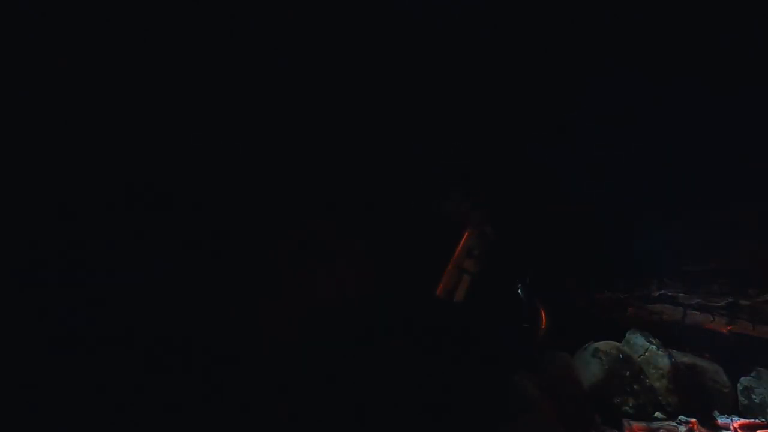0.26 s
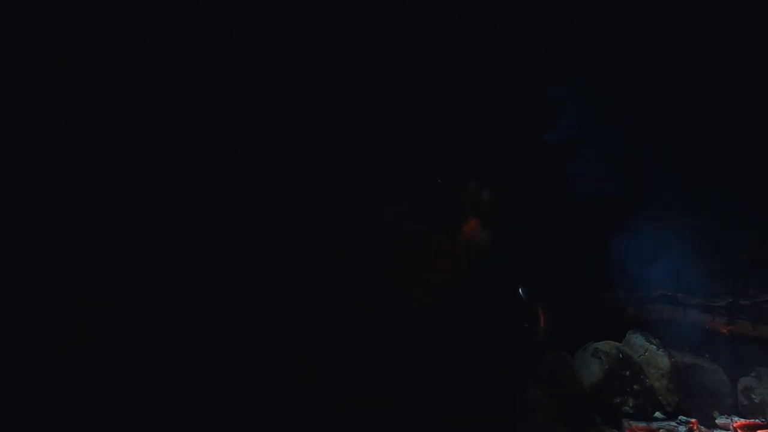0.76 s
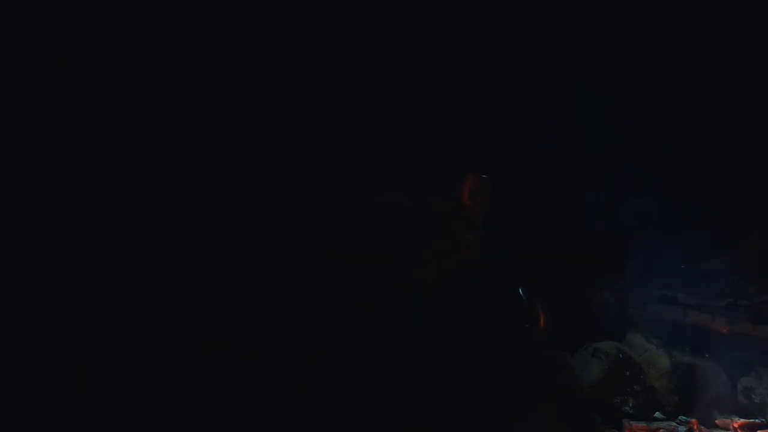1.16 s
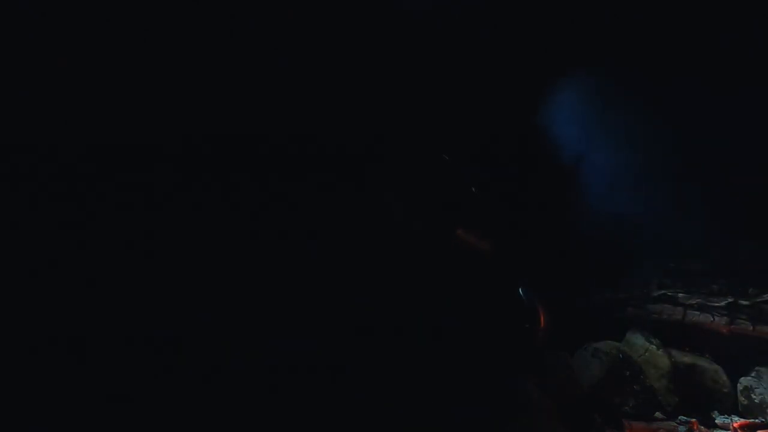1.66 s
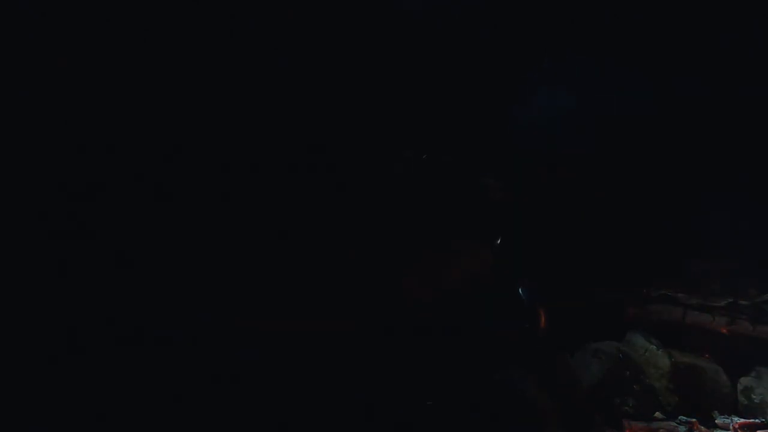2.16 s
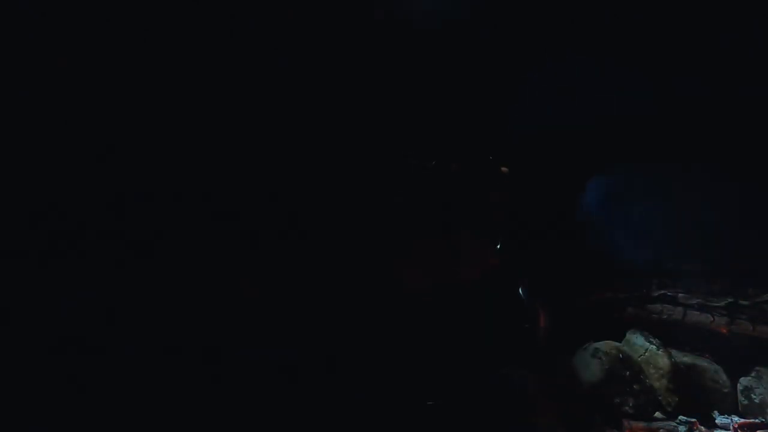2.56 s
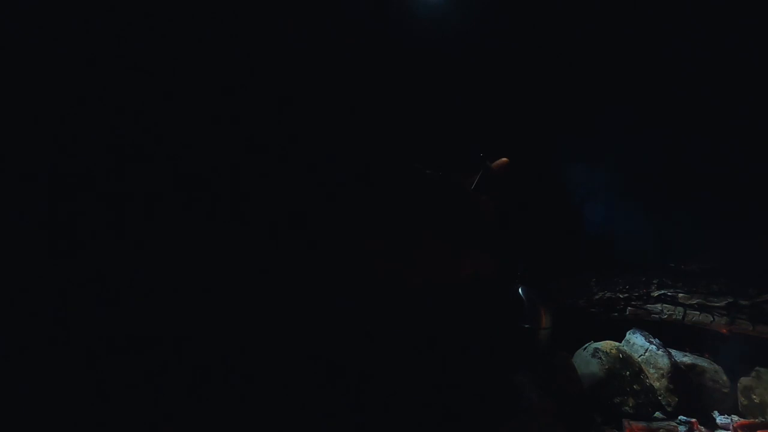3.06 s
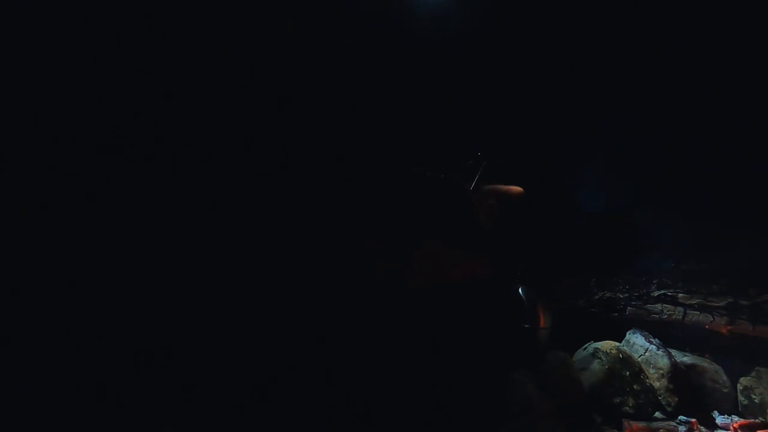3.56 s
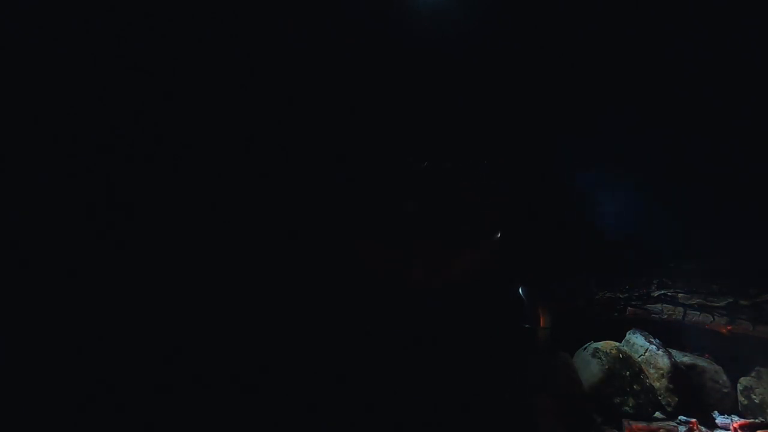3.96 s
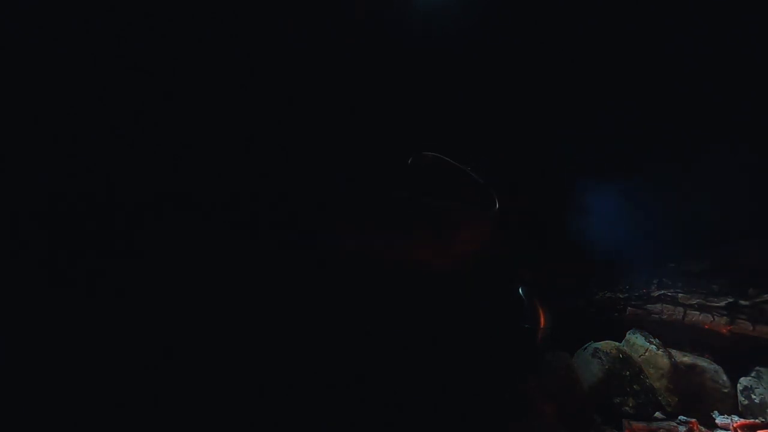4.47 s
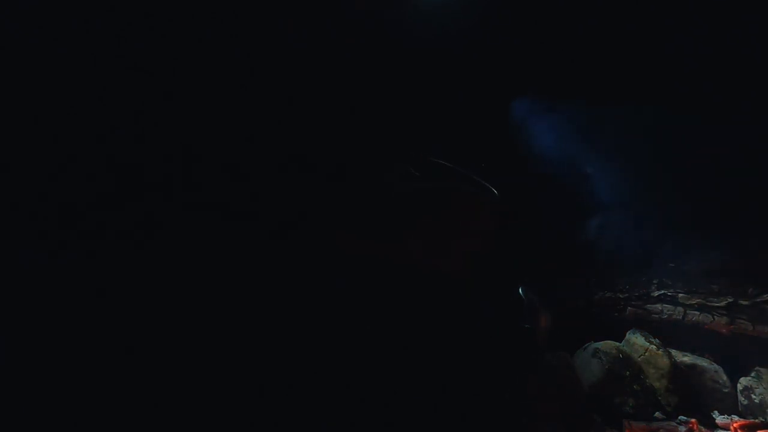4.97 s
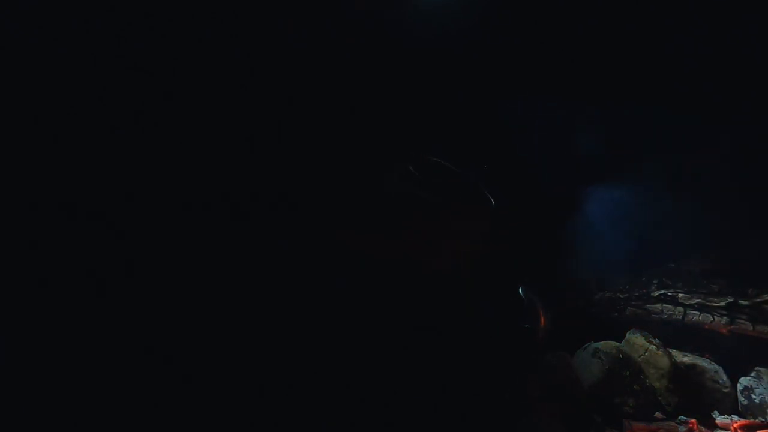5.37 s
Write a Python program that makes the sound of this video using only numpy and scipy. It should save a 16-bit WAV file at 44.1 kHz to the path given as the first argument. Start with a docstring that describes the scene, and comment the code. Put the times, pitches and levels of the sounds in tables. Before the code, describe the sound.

Close stereo pickup of hands working a spoon and tin by a small campfire. Dry, quickly damped metallic knocks and chatters, some with thin clear spoon ringing, come irregularly. A cloth rustle starts near the beginning and stops before two seconds. Short scrapes link some blows; a low-toned double clank ends the busy clatter. Soft flame flutter, low puffs, tiny wood ticks and faint hiss continue throughout.

```python
"""From the start a campfire flutters, puffs and ticks over a faint hiss (shaped noise, pulses, clicks).
Cloth rustles in bursts of noise until 1.9 s, and the spoon already rings faintly (decaying sines).
From 0.09 s it knocks and chatters on a hand-held mess tin, a little to the right (noise through modes);
a like knock at 0.25 s starts a rustle. From 0.27 s the spoon also scrapes, and rattles after the blow
at 2.35 s (gritty noise through the modes). From 1.15 s single partials outlast some knocks (sines)."""
import sys
import numpy as np
from scipy import signal
from scipy.fft import rfft, irfft, next_fast_len
from scipy.io import wavfile
from scipy.ndimage import uniform_filter1d, map_coordinates

SR = 44100
rng = np.random.default_rng(int(sys.argv[2]) if len(sys.argv) > 2 else 0)


def unload_audio(sound):
    """Save the sound as a 16-bit wav file, at the path given as the first command line argument."""
    columns = np.transpose(np.atleast_2d(sound))
    # keep every value between -1 and 1, then stretch to whole-number steps
    steps = np.round(np.clip(columns, -1, 1) * 32767)
    wavfile.write(sys.argv[1], SR, steps.astype(np.int16))


N = 247842


def amp(db):
    """Amplitude of a level in dB."""
    return 10 ** (np.asarray(db) / 20)


def unit(x):
    """x scaled to rms 1."""
    return x / np.sqrt(np.mean(x ** 2) + 1e-20)


def along(points, hz):
    """Interpolate (f/Hz, value) points on a log frequency axis."""
    f, v = np.transpose(points)
    return np.interp(np.log(hz + 1), np.log(f + 1), v)


def curves(rows, **ends):
    """One value per sample for each column after t/s."""
    s, *cols = np.transpose(rows)
    return [np.interp(np.arange(N) / SR, s, c, **ends) for c in cols]


def wobble(rate_hz):
    """Smooth random curve with rate_hz knots a second."""
    knots = rng.standard_normal(int(N * rate_hz / SR) + 4)
    return map_coordinates(knots, [np.arange(N) * rate_hz / SR])


def filtered(x, response):
    """x times a complex response of frequency."""
    m = next_fast_len(x.shape[-1] + SR // 2)
    spectrum = rfft(x, m) * response(np.fft.rfftfreq(m, 1 / SR))
    return irfft(spectrum, m)[..., :x.shape[-1]]


def rush(spectrum, alike):
    """Stereo noise of rms 1; mid and side are mixed to the left-right likeness of the table."""
    def shape(hz):
        turn = np.arccos(np.clip(along(alike, hz), -1, 1)) / 2
        return amp(along(spectrum, hz)) * [np.cos(turn), np.sin(turn)]

    mid, side = filtered(rng.standard_normal((2, N)), shape)
    return unit(np.array([mid + side, mid - side]))


def near(hz, centre_hz, width):
    """Broad resonance of height 1; width as a share of its centre."""
    w = 1j * hz * centre_hz * abs(width)
    return w / (centre_hz ** 2 - hz * hz + w)


def bands(hz):
    """Shares of the clank, the knock under it and the sheen over it; a small tin radiates no bass."""
    low = 1 / (1 + (hz / 1500) ** 8)
    high = 1 / (1 + (6000 / (hz + 1)) ** 10)
    knock = low / (1 + (390 / (hz + 1)) ** 4)
    return np.array([1 - low - high, knock, high])


def ringing(modes, hz, share):
    """One damped resonance per row, t60 times share; small plates radiate little below their modes."""
    c, db, t60 = np.transpose(modes)[:, :, None]
    width_hz = np.log(1000) / (np.pi * t60 * share)
    resonance = c / (c * c - hz * hz + 1j * hz * width_hz)
    return amp(db) * (hz / c) ** 2 * resonance / (1 + (hz / c / 2) ** 2)


# hiss spectrum: f/Hz, relative density/dB
HISS_SPECTRUM = [(300, -2), (500, -6.5), (850, -6.5), (1150, -2.5), (2000, -10.5), (5000, -13), (9000, -24),
                 (15500, -39)]


def hiss():
    """Faint steady noise with a slightly unsteady level."""
    level_db = -72.5 + 1.2 * wobble(40)
    return amp(level_db) * rush(HISS_SPECTRUM, [(500, 0.49), (3000, 0.29), (8000, 0.11)])


# flutter of the flames: t/s, level/dB
FLAME_LEVEL = [(0.0, -66.5), (1.36, -69.5), (2.35, -62), (2.58, -71.5), (3.11, -70), (5.62, -70)]
# flutter spectrum: f/Hz, relative density/dB
FLUTTER_SPECTRUM = [(15, -12.5), (30, -6.5), (100, -13.5), (155, 1), (250, -4), (450, -12), (700, -44)]


def flutter():
    """Lumpy low noise of the flames."""
    level_db, = curves(FLAME_LEVEL)
    lumps = amp(2.0 * wobble(25) + 2.2 * wobble(17.0))
    return amp(level_db) * unit(lumps * rush(FLUTTER_SPECTRUM, [(60, 0.32), (300, 0.39)]))


# strongest low thumps, from the flames or the hands: t/s (lobe peaks 8 ms later), lobe level/dB, f/Hz
STRONG_PUFFS = [(0.18, -51, 105), (0.243, -37.5, 201), (0.273, -41, 125), (.288, -43.5, 38.4),
                (.905, -53.5, 83.6), (.943, -45.5, 124), (1.182, -47, 153), (1.873, -40, 182.7),
                (1.901, -50, 170.4), (2.254, -51.5, 86.9), (2.8, -52.5, 101), (3.249, -48, 145),
                (3.82, -54, 90.4)]


def puffs():
    """Low thumps, each a short lobe of pressure riding on a slower push of air."""
    small_db, small_hz, pitch_log_span = -60, 125, 0.98
    push_db, push_slower = -13.5, 3.5
    t = np.arange(N) / SR
    small = [(N / SR * when, small_db + 2.7 * (size - .5), small_hz * np.exp(pitch_log_span * (2 * pitch - 1)))
             for when, size, pitch in rng.random((20, 3))]

    def lobe(u):
        return np.cos(2 * np.pi * u) * np.exp(-(1.5 * u) ** 2)

    out = np.zeros(N)
    for s, db, pitch_hz in list(STRONG_PUFFS) + small:
        u = (t - s - .008) * pitch_hz
        out -= amp(db) * (lobe(u) + amp(push_db) * lobe(u / push_slower))
    return out


def ticks():
    """Faint ticks of the wood: 50 filtered clicks at random times, a little stronger on the left."""
    when, size = rng.random((50, 2)).T
    clicks = np.bincount((when * N).astype(int), amp(-70.0 - 8.2 * size), N)
    colour = [(2500, -27.5), (7000, -4.5), (13000, -23.0)]  # f/Hz, gain/dB
    return filtered(clicks, lambda hz: amp(along(colour, hz))) * amp([[1], [-1.5]])


def fire():
    """Flutter, thumps and wood ticks of a campfire."""
    return flutter() + puffs() + ticks()


# cloth movement: t/s, mean level/dB
RUSTLE_LEVEL = [(0, -62), (.15, -62.5), (.2, -72), (.26, -48), (.5, -55), (.9, -64.5), (1.05, -82.5),
                (1.2, -58), (1.42, -59), (1.53, -53.5), (1.6, -59), (1.77, -57), (1.9, -67)]
# cloth spectrum: f/Hz, relative density/dB
CLOTH_SPECTRUM = [(220, -29), (350, -12), (511, 0), (749, -36.5), (1000, -6.5), (1660, -1), (2320, -2.5),
                  (2750, 0), (4840, -1.5), (12500, -20), (15500, -28)]
# cloth left-right likeness: f/Hz, correlation
CLOTH_LIKENESS = [(60, 0.53), (240, 0.5), (950, 1), (3770, 0.71), (15000, -1.1)]


def cloth():
    """A sleeve brushing as the arm moves: noise of uneven level."""
    level_db, = curves(RUSTLE_LEVEL, right=-140)
    uneven_db = 1.5 * wobble(29) + 0.54 * wobble(210)
    return amp(level_db + uneven_db) * rush(CLOTH_SPECTRUM, CLOTH_LIKENESS)


# spoon modes: f/Hz, relative level/dB, t60/s, part (0 handle, 1 bowl, 2 neck)
SPOON_MODES = [(1290, 0, .68, 0), (1795, -9, .2, 2), (2412, -11, .25, 1), (3095, -5, .25, 1),
               (3233, 0, .34, 1), (4056, 0, .2, 2), (5130, -8, .14, 2), (6436, -20, .22, 1)]
# spoon bounces free and rings: t/s, handle level/dB, bowl level/dB, neck level/dB (before scatter)
SPOON_RINGS = [(0, -61, -64, -86), (0.669, -57.5, -64, -75), (1.149, -64, -45.5, -60),
               (2.381, -43.5, -33.5, -48), (2.912, -63.5, -47, -55.5), (3.127, -62.5, -53.5, -53),
               (3.427, -65.5, -50, -45), (4.15, -58.5, -47, -54), (4.618, -67.5, -67.5, -67),
               (4.89, -63.5, -56, -51), (5.096, -65, -53.5, -53), (5.351, -46, -46, -38.5)]


def spoon():
    """Long clean modes that swell out of the blow and fade."""
    hz, db, t60, part = np.transpose(SPOON_MODES)
    t, out = np.arange(SR)[:, None] / SR, np.zeros(N + SR)
    swell = 1 - np.exp(-t / 0.0031)
    modes = amp(db - 60 * t / t60) * np.sin(2 * np.pi * hz * t) * swell
    for s, *parts_db in SPOON_RINGS:
        scatter_db = rng.normal(0, 1.4, len(hz))
        out[round(s * SR):][:SR] += modes @ amp(np.take(parts_db, part.astype(int)) + scatter_db)
    return out[:N]


# short knocks and chatters, mostly spoon on tin; the one at 0.25 s starts the cloth rustle:
# t/s, clank peak level/dB, knock level relative to clank/dB, brightest f/Hz
KNOCK_EVENTS = [(0.085, -38.5, -19, 3400), (.138, -53.5, 0, 4000), (0.2457, -41, -3.5, 1770),
                (0.3314, -29, -13, 4200), (0.343, -46, 3, 2500), (0.594, -57.5, 10.5, 3620),
                (.627, -35.5, -10.5, 2700), (0.649, -25, -5.5, 3500), (0.66, -19, -21.5, 3600),
                (0.6701, -23, -9, 3720), (0.7544, -43.5, -14, 3030), (.79, -47, -14.5, 3300),
                (.842, -25, -16, 3700), (1.08, -60.5, 2.5, 3100), (1.151, -24, -8.5, 3330),
                (1.285, -25, -23, 3470), (1.2943, -24.5, -24, 3200), (1.349, -49.5, 4.5, 2980),
                (1.363, -26, -13.5, 3430), (1.5066, -41.5, -12.5, 2750), (1.8784, -14.5, -13.5, 4470),
                (1.972, -35, -15, 3600), (1.9875, -20.5, -16.5, 3495), (2.0061, -24, -22, 3640),
                (2.037, -27, -21.5, 5000), (2.062, -27, -8, 8300), (2.1, -36, -7, 8450),
                (2.1629, -30, -21.5, 5200), (2.246, -40, -6, 3000), (2.3, -17.5, -13, 2770),
                (2.346, -14.5, 5.5, 2800), (2.578, -39, -12, 2530), (2.636, -88, 32, 2493),
                (2.9091, -25, -23.5, 5100), (2.9488, -39, -13, 1850), (3.028, -43.5, -13, 3400),
                (3.1109, -28, -15.5, 3050), (3.123, -24.5, -10, 2440), (3.1375, -30.5, -7.5, 4950),
                (3.2819, -51, 0.5, 1920), (3.426, -25, -16, 4730), (3.8672, -42, -3, 3020),
                (3.895, -36, -1.5, 2370), (3.914, -40, -2.5, 3500), (3.9506, -43, -7.5, 3230),
                (4.037, -33, -7.5, 2830), (4.1083, -38, -11, 2600), (4.128, -26, -20, 3500),
                (4.1379, -14, -15.5, 3060), (4.154, -31, -17, 3220), (4.2137, -50.5, 2.5, 3120),
                (4.356, -37.5, -6.5, 2320), (4.449, -31.5, -5, 2730), (4.518, -23.5, -8.5, 3630),
                (4.5356, -21.5, -40, 1900), (4.561, -23, -4, 3140), (4.569, -25.5, -5.5, 5270),
                (4.6178, -34, -8, 5500), (4.675, -64, 19.5, 1540), (4.887, -30.5, -2, 3520),
                (5.09, -33.5, -13, 5830), (5.1318, -48.5, -43, 4150), (5.1813, -35.5, 1, 3380),
                (5.21, -46.5, 2, 1800), (5.246, -41.5, -0.5, 2610), (5.305, -20.5, 1, 3140),
                (5.3208, -15.5, -1.5, 1800), (5.3354, -22.5, -0.5, 1760), (5.3466, -39, 0, 1810),
                (5.4487, -53.5, 11.5, 2780)]
# tin modes: nominal f/Hz, relative level/dB, t60 before the grip's share/s
TIN_MODES = [(660, 2.5, 0.068), (985, -7, .15), (1008.7, -6.5, 0.17), (1258, 7, 0.037), (1433, -2, 0.022),
             (1828, 7, 0.11), (2170, -6.5, 0.12), (2514, -1, 0.088), (2773, 6, 0.063), (2870, 5.5, .09),
             (3000, 3, 0.18), (3370, 0.5, 0.074), (3680, 0, 0.14), (3900, -4, .1), (4305, -8, 0.081),
             (4750, -4, .1), (5340, 0, 0.08), (7490, -3.5, .06), (8700, -6, 0.072)]
# radiation between the modes: f/Hz, relative density/dB
CRACK_SPECTRUM = [(180, -56.5), (300, -15), (1750, -2.5), (2070, -1), (3450, 4), (4350, -0.5), (5130, 3),
                  (6050, -5), (7620, -5), (15500, -32.5)]
# hold of the hand: t/s, share of t60 left, low mode left most free f/Hz
HAND_GRIP = [(0, 1, 1100), (1, 0.3, 905), (1.2, 0.48, 1130), (1.35, 0.61, 550), (1.901, 0.36, 730),
             (2.06, 0.79, 1076), (2.35, 1, 1050), (2.6, 1, 735), (3.3, 0.62, 651), (3.799, 0.6, 1040),
             (4.6, 0.89, 1043), (4.68, 0.17, 1423), (4.9, 0.6, 1085), (5.31, 1, 1020), (5.334, 1, 1010),
             (5.36, 1, 647), (5.6, 0.55, 1230)]
# treble over the clank: t/s, relative level/dB
SHEEN_LEVEL = [(.1, -15), (.25, -0.5), (.33, -15.5), (.65, -16.5), (.85, -13), (1.36, -13.5), (2.06, -4.5),
               (2.3, -2.5), (2.35, -12), (2.6, -21), (3.03, -14.5), (3.12, -10), (3.43, -17), (4.13, -9.5),
               (4.45, -11.5), (4.9, -12), (5.12, -2), (5.22, -23.5), (5.31, -6.5), (5.35, -19)]


def knocks():
    """Each is a blow and a dying chatter through the tin's modes, which answer with random strengths."""
    size, lead = 2 ** 14, 512  # samples
    chatter_t60_s, grip_power, chatter_log_spread = 0.054, 0.32, .15  # a tight grip shortens the bounces
    settle_db, settle_t60_s = -29.5, 0.14  # faint rattle to rest
    flex_log_spread = .008  # the fingers bend the tin, shifting its modes from knock to knock
    hz, t = np.fft.rfftfreq(size, 1 / SR), np.arange(size) / SR
    out = np.zeros(N + size)
    grip_s, *grip_columns = np.transpose(HAND_GRIP)
    # the knock is mostly modes, the clank also noise
    crack = 0.028 * amp(along(CRACK_SPECTRUM, hz)) * (1 - 0.34 * bands(hz)[1])
    for s, db, knock_db, bright_hz in KNOCK_EVENTS:
        spot = amp(3.5 * rng.standard_normal(len(TIN_MODES)))
        bend = flex_log_spread * rng.standard_normal((len(TIN_MODES), 1))
        bent = np.array(TIN_MODES) * np.exp(bend * [1, 0, 0])
        share, free_hz = (np.interp(s, grip_s, col) for col in grip_columns)
        sheen_db = np.interp(s, *np.transpose(SHEEN_LEVEL))

        chatter_s = chatter_t60_s * abs(share) ** grip_power * np.exp(rng.normal(0, chatter_log_spread))
        grit, bounces = rng.standard_normal((2, size))
        force = grit * amp(3.96 * uniform_filter1d(bounces, size=30) * np.sqrt(30))
        decay = amp(-60 * t / max(chatter_s, .005)) + amp(settle_db - 60 * t / settle_t60_s)
        force *= (1 - np.exp(-t / 0.0019)) ** 2 * decay
        # the first blow stands out more in a hard knock
        force[80:89] += 0.9 * amp(0.86 * (db + 0.28 * knock_db + 22.0)) * np.hanning(9)

        favour = 1 + 1.4 * near(hz, bright_hz, 0.15) + 4.1 * near(hz, free_hz, 0.09)
        tin = spot @ ringing(bent, hz, np.clip(share, .2, 1.5))
        body = rfft(np.roll(force, lead)) * favour * (tin + crack)
        parts = irfft(body * bands(hz))
        levels = amp(db + np.array([0, knock_db, sheen_db]))
        out[round(s * SR):][:size] += levels / np.abs(parts).max(axis=1) @ parts
    return out[lead:][:N]


def stroke(u, rising):
    """Strength of one gritty noise over its course u = 0..1: it swells to a peak and eases off to nothing."""
    slope_db, roundness = 9, 0.41
    rising = np.clip(rising, .03, .97)
    away = np.where(u < rising, 1 - u / rising, (u - rising) / (1 - rising)).clip(0, 1)
    return amp(-slope_db * away ** roundness) * (1 - away ** 1.8)


# gritty noise of spoon and tin: drags, and the rattle after the blow at 2.35 s:
# t/s, length/s, level at the peak/dB, share of the length spent rising,
# brightest f at mid-length/Hz, low modes relative level/dB
GRITTY_NOISES = [(0.272, 0.13, -42.5, 0.45, 3860, -9.5), (1.827, 0.16, -41, 1, 3400, -7),
                 (2.028, 0.2, -47, 0.31, 3460, -8), (2.128, 0.23, -35, 0.79, 3166, -3),
                 (2.344, 0.096, -31.5, 0.068, 2930, -15.5), (2.927, 0.069, -47, 0.065, 3340, -8.5),
                 (3.09, 0.051, -41.5, 0.91, 3020, -7), (3.274, 0.054, -57.5, .1, 2484, -3),
                 (3.984, 0.066, -50, 0.58, 2600, -4), (4.481, 0.1, -34, 0.5, 4960, -2),
                 (4.9, 0.13, -61.5, 0.83, 4820, -7.5), (5.182, 0.1, -62, 0.26, 2980, 7)]


def scrapes_and_rattle():
    """Gritty noise through the tin; other modes take the lead along the way and the bright region climbs."""
    size, lead, places = 2 ** 15, 512, np.linspace(0, 1, num=4)
    climb_log, under_ratio = 0.21, 0.41  # rise of the bright region; second region as a share of its f
    floor_hz = 785  # the modes below are weakened
    hz, t, out = np.fft.rfftfreq(size, 1 / SR), np.arange(size) / SR, np.zeros(N + size)
    shares = bands(hz)
    shares[1] /= 1 + (floor_hz / (hz + 1)) ** 8
    roughness = np.pad(amp(3 * wobble(500) + 1.5 * wobble(50)), (0, size))
    for s, length, db, rising, bright_hz, low_db in GRITTY_NOISES:
        first = round(s * SR)
        strength = uniform_filter1d(stroke(t / length, rising), size=200)
        grit = rng.standard_normal(size) * roughness[first:][:size] * strength
        parts = 0
        for place, spot in zip(places, rng.standard_normal((len(places), len(TIN_MODES)))):
            tin = amp(4.0 * spot) @ ringing(TIN_MODES, hz, 0.8) + 0.04 * amp(along(CRACK_SPECTRUM, hz))
            lead_hz = bright_hz * np.exp(climb_log * (place - .5))
            favour = 1 + 3.1 * near(hz, lead_hz, 0.3) + 2.0 * near(hz, under_ratio * lead_hz, 0.16)
            # crossfade from place to place
            turn = np.cos(np.pi / 2 * ((t / length - place) * (len(places) - 1)).clip(-1, 1))
            parts = parts + irfft(rfft(np.roll(grit * turn, lead)) * tin * favour * shares)
        clank, knock = parts[0] + parts[2], parts[1]
        norm = np.linalg.norm(strength)
        clank *= norm / np.linalg.norm(clank)
        knock *= norm / np.linalg.norm(knock)
        out[first:][:size] += amp(db) * (clank + amp(low_db) * knock)
    return out[lead:][:N]


# partials that stand out of one knock and outlast it: t/s, f/Hz, level before the soft start/dB, t60/s
PING_PARTIALS = [(1.153, 2929, -30, .14), (1.155, 4727, -46, .12), (1.366, 3144, -43, .33),
                 (1.368, 1965, -52, .26), (2.35, 964, -22, .21), (3.428, 2600, -64, 1.0),
                 (5.35, 7569, -70, .8)]


def pings():
    """Single decaying partials with a soft start."""
    t, out = np.arange(N) / SR, np.zeros(N)
    for s, hz, db, t60 in PING_PARTIALS:
        u = (t - s).clip(0)
        out += amp(db - 60 * u / t60) * (1 - np.exp(-u / .003)) * np.sin(2 * np.pi * hz * u)
    return out


# shading of the left port: f/Hz, left minus right/dB
PORT_SHADE = [(60, 2.5), (180, -18), (550, -3.5), (1650, -1.5), (4970, 1), (15000, -22)]


def placed(x):
    """The right port hears x first; ground and body send short echoes, different at each port."""
    t = np.arange(SR // 10) / SR
    echoes = rng.standard_normal((2, len(t))) * amp(-60 * t / .045) * (t > .001)
    colour = [(600, -30.5), (3000, -6.5), (9000, -7.5)]  # f/Hz, gain/dB
    echoes = filtered(echoes / np.linalg.norm(echoes[0]), lambda hz: amp(along(colour, hz)))
    lag_s = .000055
    side = np.array([[.5], [-.5]])

    def port(hz):
        return amp(side * along(PORT_SHADE, hz)) * np.exp(-2j * np.pi * hz * lag_s * side)

    return filtered(x, port) + signal.fftconvolve(x[None], echoes, axes=1)[:, :N]


def scene():
    """Hiss, cloth and fire around the knocks, ringing and scrapes, which are placed to the right."""
    air = hiss()
    struck = knocks() + spoon() + scrapes_and_rattle() + pings()
    return placed(struck) + cloth() + fire() + air


def record(dry):
    """Band limit: nothing passes from 15.8 kHz up."""
    top_hz = 15800
    return filtered(dry, lambda hz: hz < top_hz)


dry = scene()
out = record(dry)
unload_audio(out)
```